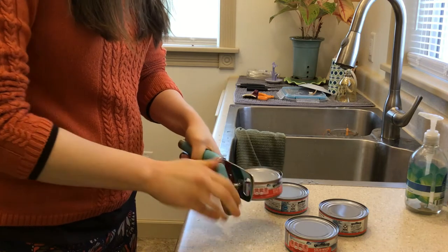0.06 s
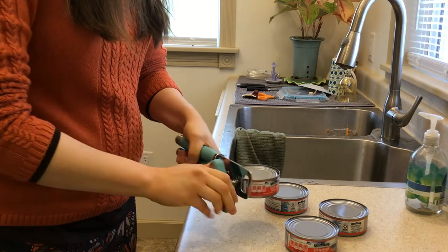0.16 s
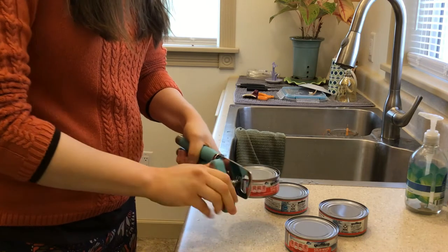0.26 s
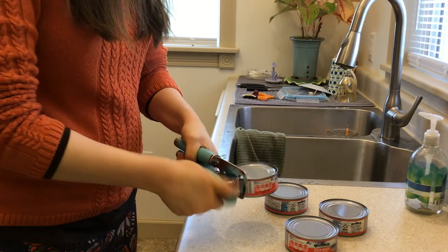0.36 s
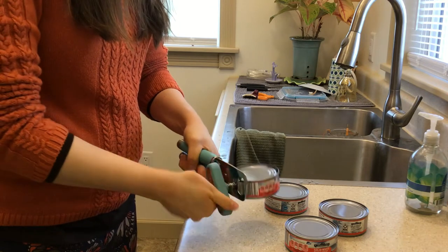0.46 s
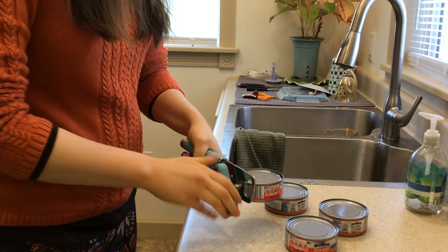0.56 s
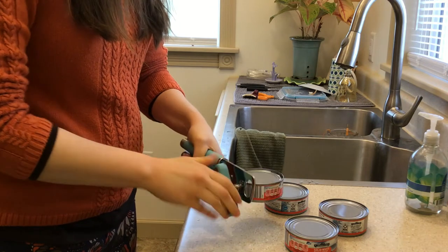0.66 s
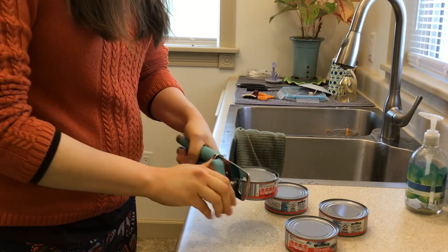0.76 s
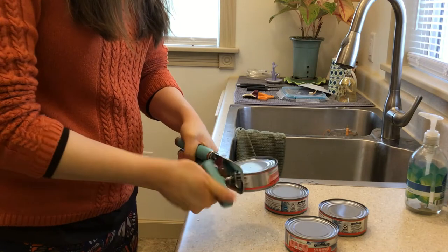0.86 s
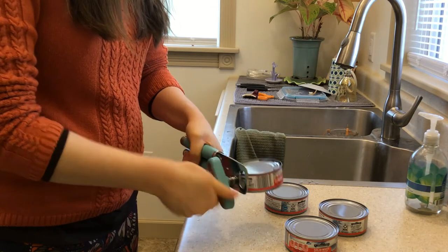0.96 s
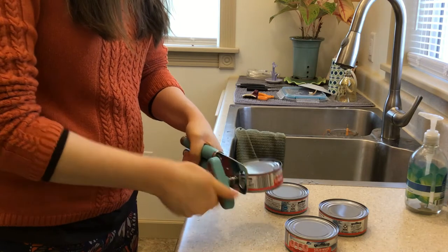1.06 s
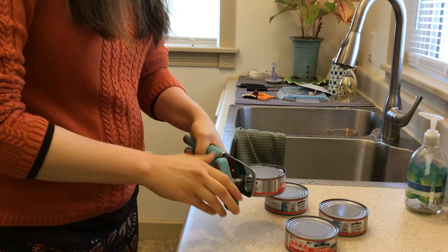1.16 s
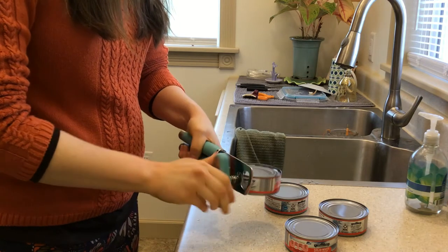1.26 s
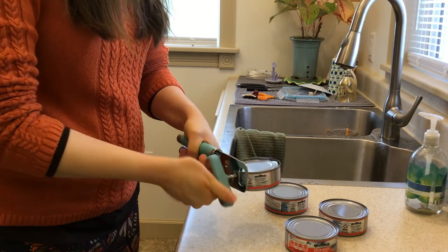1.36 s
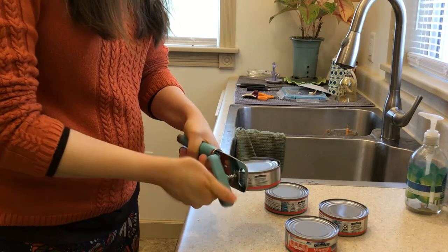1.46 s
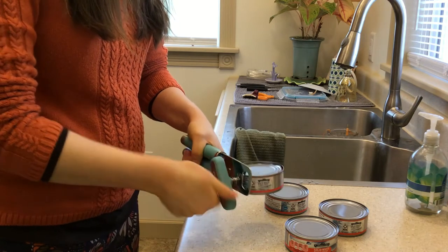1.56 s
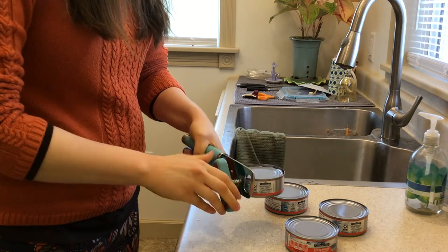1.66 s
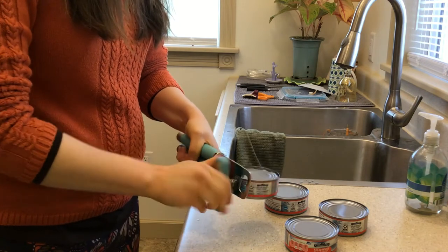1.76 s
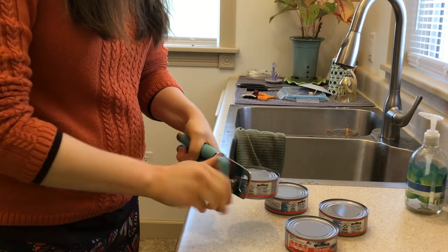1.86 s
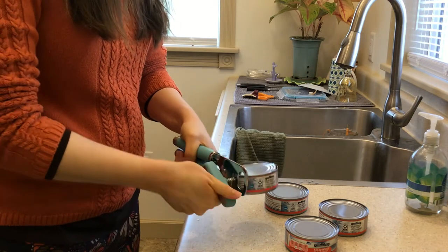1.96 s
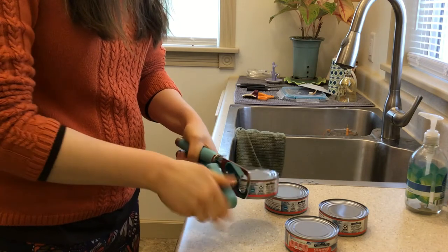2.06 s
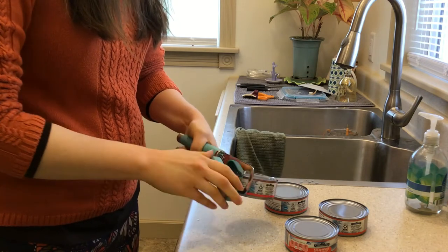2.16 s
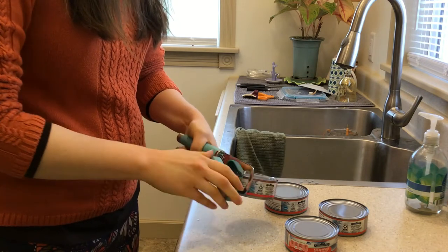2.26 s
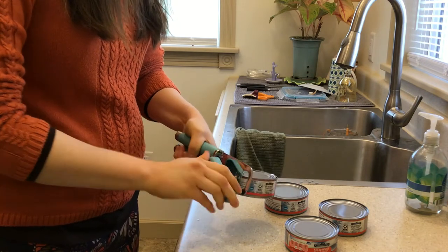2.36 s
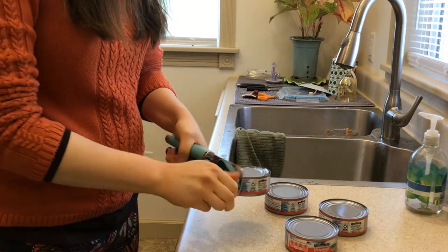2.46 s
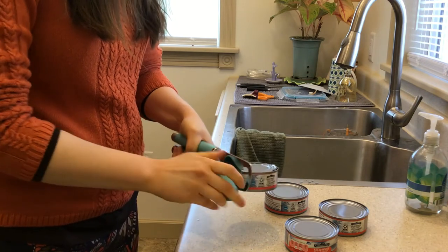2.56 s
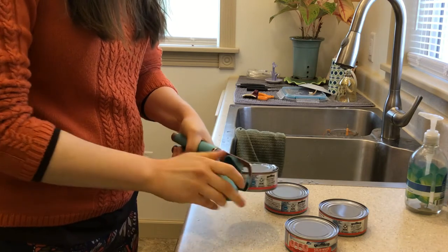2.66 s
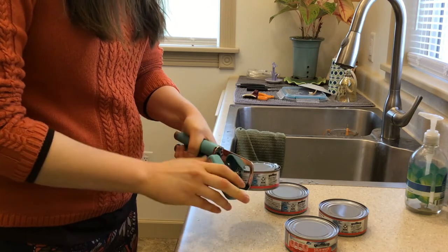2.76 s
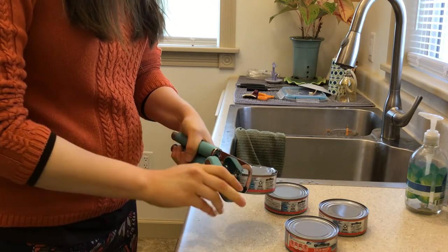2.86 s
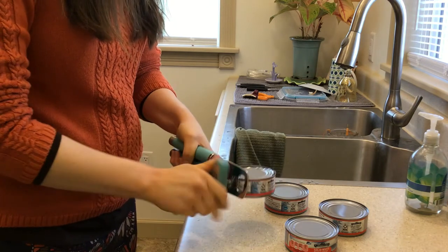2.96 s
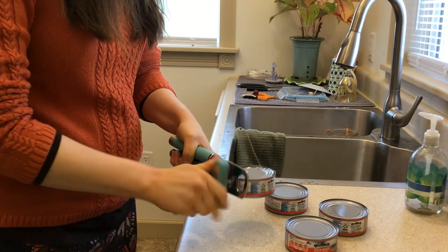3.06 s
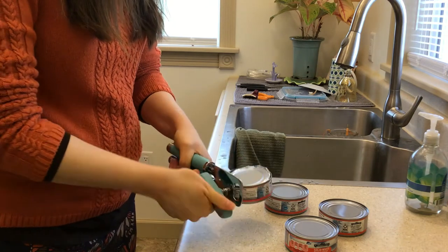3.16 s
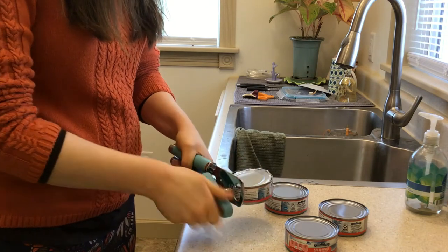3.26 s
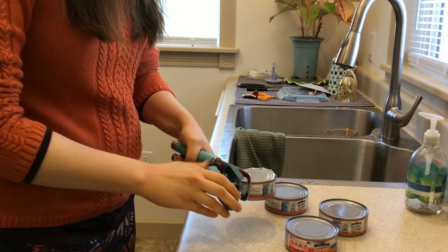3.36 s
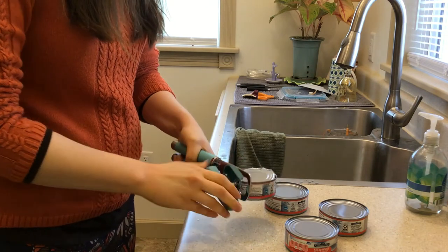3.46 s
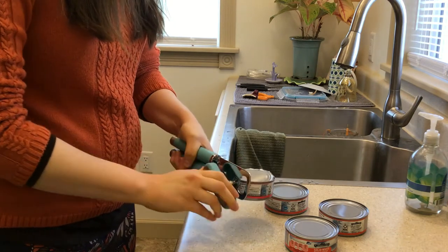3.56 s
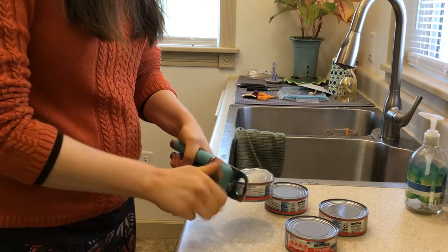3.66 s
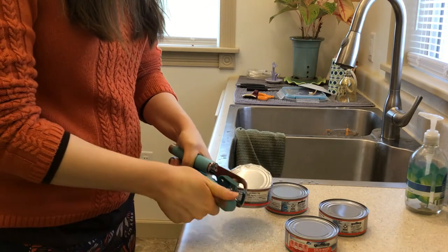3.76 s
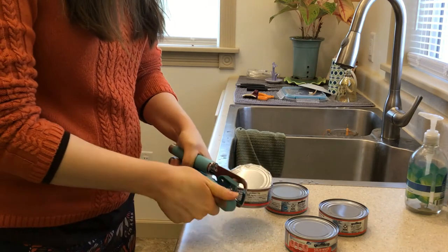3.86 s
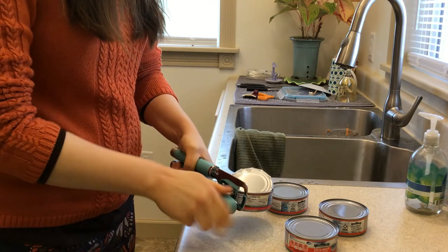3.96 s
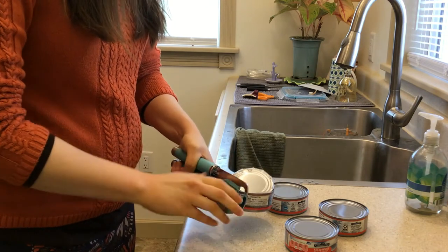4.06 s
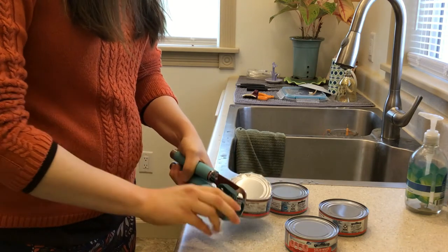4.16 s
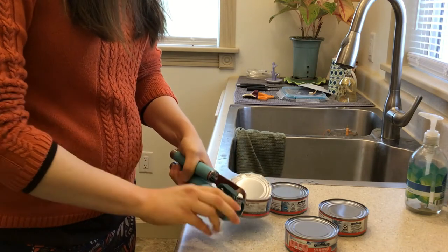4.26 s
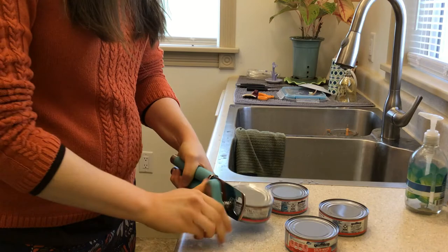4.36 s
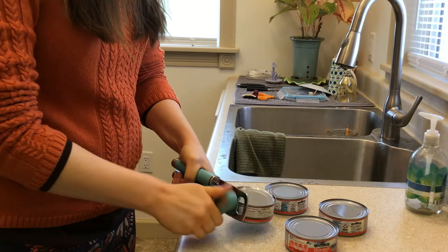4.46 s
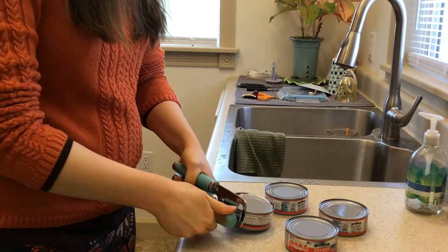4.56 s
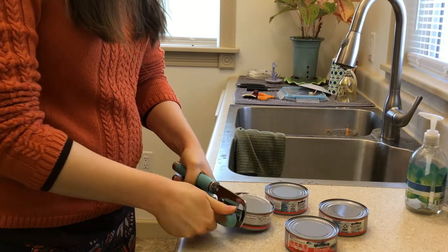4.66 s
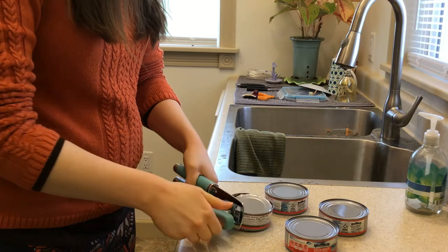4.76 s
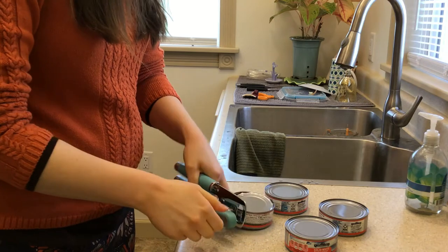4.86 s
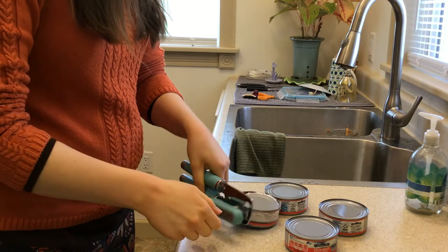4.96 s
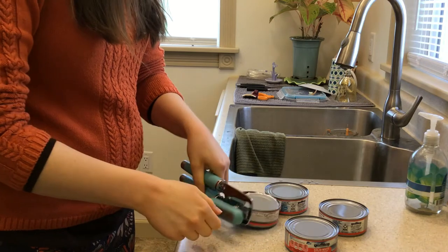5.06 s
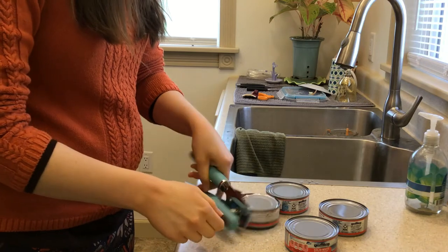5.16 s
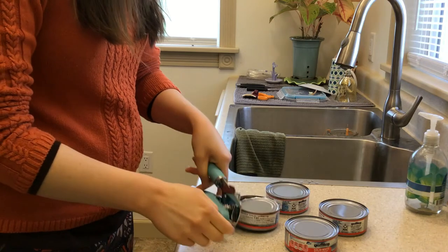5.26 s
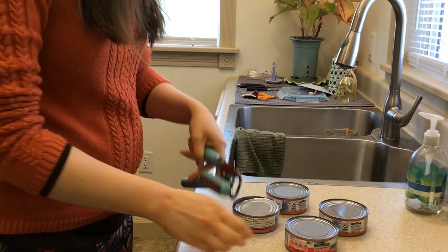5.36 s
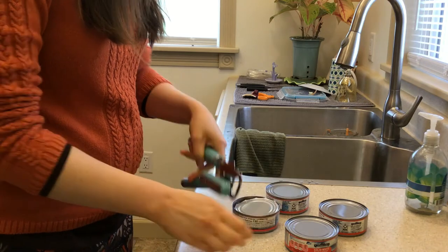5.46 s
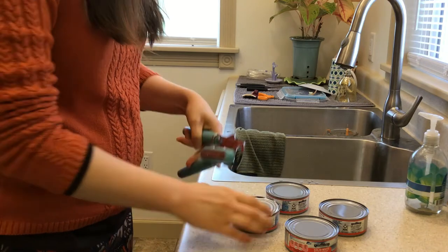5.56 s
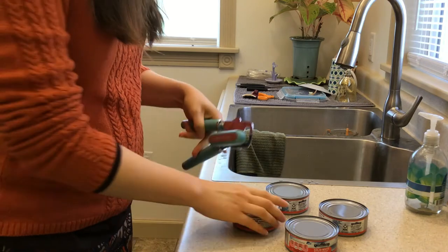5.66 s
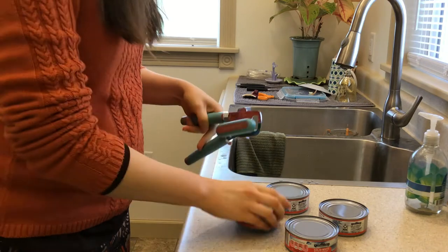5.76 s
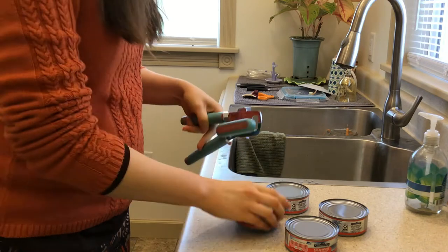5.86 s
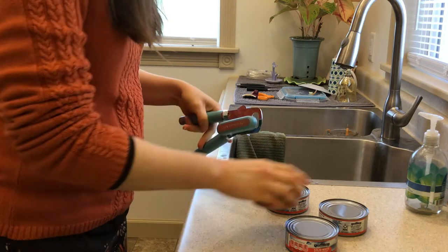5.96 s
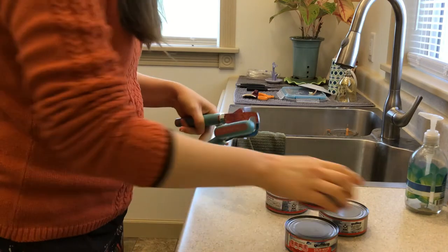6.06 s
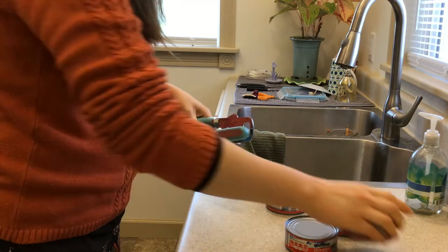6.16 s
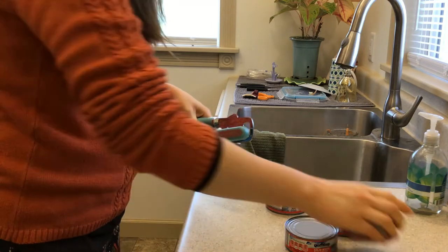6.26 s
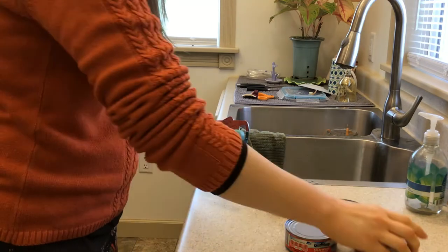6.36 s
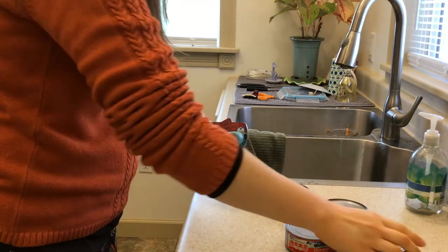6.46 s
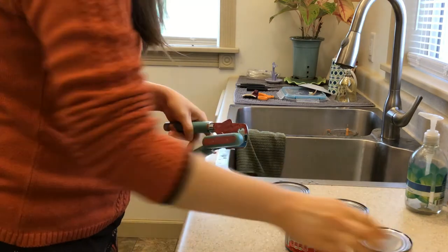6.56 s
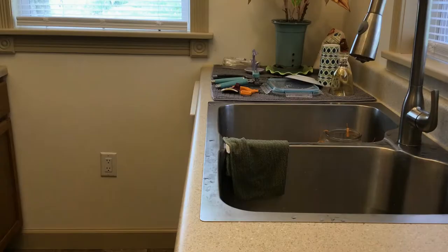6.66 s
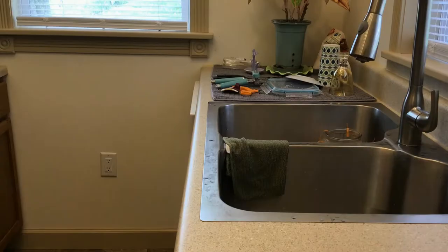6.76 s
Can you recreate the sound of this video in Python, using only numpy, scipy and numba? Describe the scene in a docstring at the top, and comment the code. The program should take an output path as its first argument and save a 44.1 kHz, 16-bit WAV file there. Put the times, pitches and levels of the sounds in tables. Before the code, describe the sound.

Close to a kitchen counter, a twist-key opener grinds round a can: rasping metal strokes, bright ticks and tiny cracks, gaps between grips. Two bright lid snaps ring out past the middle. Then come a hollow can knock, a cluster of clacks with low counter thuds and jaw rattle, soft movement, and a final double knock. Short room reverberation and quiet air surround it; the level briefly vanishes near the end.

```python
"""In a hard kitchen, a hand-cranked opener cuts round a small steel can, one crunching stroke for each twist.
Streams of tiny noise fractures drive lid and can resonances; short cracks and damped modes make the snaps.
The lid snaps twice as it comes free; the full can knocks on the counter, is let go, and is set down again.
Damped modes boom in the counter, a noise tail makes the room ring, and shaped noise and a sine make air and hum.
A short hollow buzz sounds once; near the end the level dips to nothing and only partly recovers."""
import sys
import numpy as np
from scipy import signal
from scipy.fft import rfft, irfft, next_fast_len
from scipy.io import wavfile
from scipy.ndimage import uniform_filter1d
from numba import njit

SR = 44100
rng = np.random.default_rng(int(sys.argv[2]) if len(sys.argv) > 2 else 0)


def to_wav(s):
    """Save 16-bit WAV."""
    ch = np.atleast_2d(s).T  # columns
    pcm = np.round(np.clip(ch, -1, 1) * 32767)  # PCM
    wavfile.write(sys.argv[1], SR, pcm.astype(np.int16))


N = 301188
T = np.arange(N) / SR  # time in seconds

# Levels in the tables are relative: each source and the room set the final balance.
# One row for each twist of the key, the last two for the rim scraping out of the jaws:
# start_s, length_s (up to the peak), level_db, treble_share_db, can_level_db, lid_pitch_hz (at the peak),
# lid_ring_share_db
TWISTS = [ (-0.1, 0.11, -44.5, -11.5, -57.5, 1196, -3), (0.356, 0.14, -45, -6, -57, 1350, 2),
          (0.875, 0.12, -41.5, -8, -59.5, 2420, -9), (1.395, 0.11, -40, -7, -56.5, 1775, -5.5),
          (1.923, 0.095, -41.5, -10, -60, 2010, 0.5), (2.537, 0.018, -47, -12, -64, 1970, -4),
          (3.051, 0.17, -42.5, -9.5, -68.5, 1740, -8.5), (3.692, 0.092, -51.5, -10, -71.5, 1847, -14),
          (4.399, 0.13, -50, -6.5, -66, 2540, -2.5), (5.171, 0.15, -57.5, -6, -57.5, 1030, 0.5),
          (5.36, 0.077, -43, -5, -54, 1018, -6.5), ]
# Spectrum of tearing steel: frequency_hz, level_db
TEARING_STEEL = [(100, -32.5), (350, -7), (800, -7.5), (1400, -1), (2200, 0), (2800, -0.5), (4100, -4.5),
                 (5000, -7.5), (6500, -8), (8500, -16), (11000, -34), (15500, -42)]
# Spectrum of cracking steel: frequency_hz, level_db
CRACKING_STEEL = [(100, -36), (700, -10.5), (1200, -14), (1700, 4), (2400, -0.5), (4300, -4), (5200, -10),
                  (6800, -16.5), (9000, -24.5), (12000, -42.5), (15500, -44)]
# The lid's modes beside its main resonance: frequency_hz, level_db, t60_s
LID_MODES = [(711, -17.5, 0.056), (1640, -9.5, .025), (2279, -5, 0.087), (2700, -4.5, .02),
             (2904, -7, 0.058), (3220, 0, 0.0489), (3475, -6, .025), (3928, 1, .025), (3970, -9, .03),
             (4316, -1.5, .025), (5050, -15, 0.027)]


def undb(db):
    """Decibels to gain."""
    return 10 ** (np.asarray(db) / 20)


def unit(x):
    """Scale to rms 1."""
    return x / np.sqrt(np.mean(x ** 2))


def blow(x):
    """Scale a struck sound to the energy of 5 ms at rms 1."""
    return x * np.sqrt(SR / 200 / np.sum(x ** 2))


def at_hz(points, hz):
    """Read a table on a log-frequency axis."""
    f, value = np.transpose(points)
    return np.interp(np.log(hz + 1), np.log(f), value)


def colour(x, points, tilt=0, pivot_hz=2000):
    """Causal minimum-phase filter with the given spectrum, tilted in dB per octave about a pivot."""
    n = 2 * next_fast_len(len(x))
    hz = np.arange(n // 2 + 1) * SR / n
    db = at_hz(points, hz) + tilt * np.log2(np.maximum(hz, 300) / pivot_hz)
    # folding the cepstrum forward in time makes the filter causal
    cepstrum = irfft(db * np.log(10) / 20)
    cepstrum[1:n // 2] *= 2
    cepstrum[n // 2 + 1:] = 0
    response = np.exp(rfft(cepstrum))
    return irfft(rfft(x, n) * response)[:len(x)]


def add(track, s, sound):
    """Mix a sound in at time s."""
    i = max(int(s * SR), 0)
    track[i:i + len(sound)] += sound[:max(N - i, 0)]


def high_pass(x, order, hz):
    """Butterworth filter that takes away the bass."""
    return signal.sosfilt(signal.butter(order, hz, "high", fs=SR, output="sos"), x)


@njit
def resonate(x, hz, width):
    """Resonance as a state-variable band-pass whose centre moves every sample; width in Hz."""
    y = np.empty(len(x))
    band, low = 0., 0.
    for i in range(len(x)):
        g = np.tan(np.pi * hz[i] / SR)
        damping = width / hz[i]
        v = (band + g * (x[i] - low)) / (1 + g * (g + damping))
        band = 2 * v - band
        low = low + 2 * g * v
        y[i] = damping * v
    return y


def ring(modes, scatter_db, detune):
    """Damped modes, dB as energy; every blow lands on a slightly different spot."""
    hz, db, t60 = np.transpose(modes)[:, :, None]
    t = T[:SR // 2]
    size, shift = rng.standard_normal((2, len(modes), 1))
    sign = rng.choice([-1, 1], hz.shape)
    gain = sign * undb(db + scatter_db * size) / np.sqrt(t60)
    decay = np.exp(-np.log(1000) * t / t60)
    tones = np.sin(2 * np.pi * hz * (1 + detune * shift) * t)
    return blow(np.sum(gain * decay * tones, axis=0))


def contact(points, tilt, chatter_s, chatter):
    """A sharp push with a few milliseconds of chatter behind it, flattened in spectrum, then coloured."""
    t = T[:SR // 10]
    push = chatter * rng.standard_normal(len(t)) * np.exp(-t / chatter_s)
    push[0] += 1
    # keep the phase only, so every frequency is equally strong
    even = irfft(np.exp(1j * np.angle(rfft(push))))[:SR // 20]
    # the contact takes a fraction of a millisecond to build
    build = 1 - np.exp(-t[:len(even)] / 0.00052)
    return blow(colour(even * build, points, tilt))


def twists(bite_s=0.02, build_db_per_s=98, release_db_per_s=498.5):
    """The wheel bites, pressure builds steadily, then the hand lets go; the can drones evenly under the grip."""
    force, bright, deep = np.zeros((3, N))
    for start, length, db, treble_db, can_db, _, _ in TWISTS:
        past_peak = T - start - length
        bite = np.clip((T - start) / bite_s, 0, 1)
        grip = bite * undb(-release_db_per_s * np.clip(past_peak, 0, 1))
        push = grip * undb(db + build_db_per_s * np.minimum(past_peak, 0))
        force += push
        bright += push * undb(treble_db)
        deep += grip * undb(can_db)
    return force, bright, deep


def lid_state(rise_octaves_per_s=1.54, flex_s=0.12):
    """Pitch and ring share of the lid's main resonance; near each peak the pitch climbs as the lid is strained."""
    start, length, _, _, _, hz, db = np.transpose(TWISTS)
    peaks = start + length
    nearest = np.searchsorted((peaks[1:] + peaks[:-1]) / 2, T)
    strain_s = np.clip(T - peaks[nearest], -flex_s, flex_s)
    pitch = hz[nearest] * 2 ** (rise_octaves_per_s * strain_s)
    return pitch, undb(db[nearest])


def cutting(fractures_per_s=1400, spread_db=3.5, grit=.08, surge_db=4.5,
            lid_width_hz=130., can_hz=430., can_width_hz=350.):
    """The wheel tears the lid in a stream of tiny fractures, which ring the lid and the can as they go."""
    force, bright, deep = twists()
    lid_hz, lid_share = lid_state()
    sizes = undb(spread_db * np.minimum(rng.exponential(size=N), 2)) * rng.choice([-1, 1], N)
    fractures = unit(sizes * (rng.random(N) < fractures_per_s / SR))
    fractures = fractures + grit * rng.standard_normal(N)
    # the blade sticks and slips, so the fractures come in clusters
    slip = np.tanh(unit(uniform_filter1d(rng.standard_normal(N), size=300)))
    fractures = unit(fractures * undb(surge_db * slip))
    # bending waves spread each fracture over a few milliseconds
    spread = contact(TEARING_STEEL, tilt=0, chatter_s=0.0025, chatter=.6)
    tear = unit(signal.fftconvolve(fractures, spread)[:N])
    crunch = signal.sosfilt(signal.butter(2, 4500, fs=SR, output="sos"), tear)
    fizz = high_pass(tear, 3, 4600)
    lid = unit(resonate(fractures, lid_hz, lid_width_hz)) * lid_share
    steel = unit(signal.fftconvolve(fractures, ring(LID_MODES, 1, 0.0034))[:N])
    can = unit(resonate(fractures, np.full(N, can_hz), can_width_hz))
    cut = undb(-7.5) * crunch + undb(-7.0) * lid + undb(-22) * steel
    return force * cut + bright * undb(5) * fizz + deep * undb(-3.0) * can


def gritty_ticks(ticks_per_s=70, spread_db=3, level_db=-13, tilt=4):
    """Bigger fractures stand out of the cut as bright ticks, spread at random and following its force."""
    ticks = undb(spread_db * rng.standard_normal(N)) * (rng.random(N) < ticks_per_s / SR)
    tick = contact(CRACKING_STEEL, tilt, chatter_s=0.0015, chatter=1.0)
    force = twists()[0]
    return undb(level_db) * force * unit(signal.oaconvolve(ticks, tick)[:N])


def snaps(main_db=1, main_t60=0.041, swell_s=0.00044):
    """Steel gives way with a short tearing crack and the lid rings at its present pitch."""
    # The blade breaks through the rim: time_s, crack_db, tilt_db_per_octave, lid_ring_db
    breaks = [(0.4102, -47.5, -12.5, -63), (0.4533, -45.5, 2.5, -50), (0.9007, -55.5, -8.5, -64),
              (0.9848, -41, -4.5, -59), (1.5611, -45, 3.5, -55), (1.879, -42.5, -1, -64),
              (1.9607, -42.5, 12, -63), (1.9675, -40.5, -1.5, -40.5), (2.4379, -60.5, 1, -59),
              (2.554, -58, -8, -56), (3.083, -55, 9.5, -77), (3.207, -60, 16, -46),
              (3.788, -31, 4.5, -28.5), (3.8953, -33.5, -3.5, -30), (3.902, -38, 2.5, -32),
              (3.923, -56, -5.5, -61), (4.4363, -54.5, 7, -73)]
    out = np.zeros(N)
    pitch = lid_state()[0]
    swell = 1 - np.exp(-T[:SR // 2] / swell_s)
    for s, crack_db, tilt, ring_db in breaks:
        modes = [(pitch[int(s * SR)], main_db, main_t60)] + list(LID_MODES)
        crack = contact(CRACKING_STEEL, tilt, chatter_s=0.0038, chatter=0.37)
        add(out, s, undb(crack_db) * crack)
        lid = ring(modes, scatter_db=2, detune=.016)
        add(out, s, undb(ring_db) * blow(swell * lid))
    return out


def knocks():
    """The rim clacks, the full can rings briefly, and the counter booms after it."""
    # The can meets the counter: time_s, clack_db, tilt_db_per_octave, end_ring_db, body_ring_db, boom_db
    impacts = [(4.499, -47.5, 0.5, -58, -53, -32), (4.8555, -26, -1.5, -36, -54.5, -33),
               (5.17, -49, -4, -52, -60, -41.5), (5.3127, -25.5, -1, -19.5, -39, -36),
               (5.3206, -34, -1, -40, -20.5, -25), (5.328, -29.5, 3.5, -42.5, -50, -46.5),
               (5.372, -30, 2.5, -49, -47, -57), (5.461, -29.5, 0.5, -34.5, -51, -23.5),
               (5.483, -32.5, -6, -60.5, -62.5, -47), (5.845, -63, -3, -69, -67.5, -52),
               (6.51, -26, 1, -37, -37, -39.5), (6.534, -21, 1.5, -26.5, -27, -25.5),
               (6.5486, -44, -1, -44, -46, -36.5)]
    # Spectrum of rim on stone: frequency_hz, level_db
    rim_on_stone = [(60, -16), (160, 0.5), (500, -1), (680, 1.5), (850, -0.5), (1050, 6.5), (1300, 0),
                    (2100, -1.5), (3200, -9.5), (4200, -12), (6000, -15.5), (9300, -26.5), (12000, -32.5),
                    (15500, -41.5)]
    # The can's drum-like end: frequency_hz, level_db, t60_s
    end_modes = [(1155, -9.5, 0.09), (1190, -7, 0.066), (1428, -15, .1), (1574, -4.5, 0.031),
                 (1695, -3.5, 0.0122), (1840, -15, 0.038), (2038, -8, 0.068), (3097, -18, 0.023)]
    # The full can rocking on its base: frequency_hz, level_db, t60_s
    body_modes = [(232.8, -9, 0.12), (298, -3.5, 0.074), (389.6, -4.5, 0.18), (428, -3.5, 0.032),
                  (512, -14, 0.14), (615, -7, 0.025)]
    # Counter top and cabinet: frequency_hz, level_db, t60_s
    counter_modes = [(69.6, -5, 0.43), (83.7, -5, 0.14), (121, -7.5, 0.18), (171.4, -11.5, .35),
                     (228.8, -11, 0.32)]
    can, boom = np.zeros((2, N))
    # the heavy slab takes a moment to get moving
    swell = 1 - np.exp(-T[:SR // 2] / 0.0027)
    for s, clack_db, tilt, end_db, body_db, boom_db in impacts:
        add(can, s, undb(clack_db) * contact(rim_on_stone, tilt, chatter_s=0.0021, chatter=0.32))
        add(can, s, undb(end_db) * ring(end_modes, scatter_db=1.5, detune=.006))
        add(can, s, undb(body_db) * ring(body_modes, scatter_db=1, detune=0.0056))
        slab = ring(counter_modes, scatter_db=8.5, detune=0.013)
        add(boom, s, undb(boom_db) * blow(swell * slab))
    return can, boom


def hollow_buzz(centre_s=1.432, length_s=0.045, pitch_hz=199.7, level_db=-47.5, jitter=0.0045, tilt=-5,
                low_cut_hz=480):
    """A short hollow buzz of odd harmonics on a wavering 200 Hz pitch, with its bass cut."""
    n = int(length_s * SR)
    waver = unit(uniform_filter1d(rng.standard_normal(SR // 2), size=300))[:n]
    phase = 2 * np.pi * np.cumsum(pitch_hz * (1 + jitter * waver)) / SR
    # a rounded square wave holds odd harmonics only; its slope is a pulse at each flip
    square = np.tanh(10 * np.sin(phase))
    buzz = high_pass(colour(np.gradient(square), TEARING_STEEL, tilt), 4, low_cut_hz)
    out = np.zeros(N)
    add(out, centre_s - length_s / 2, undb(level_db) * np.hanning(n) * unit(buzz))
    return out


def clinks(tick_db=-5):
    """Loose steel parts of the opener tap each other, each tap a tick and a ring of the plates."""
    # The opener's jaws and gears rattle: time_s, level_db
    taps = [(1.35, -58.5), (5.167, -52), (5.229, -61.5), (5.3172, -46), (5.373, -39.5), (5.416, -46),
            (5.4633, -40.5)]
    # The opener's steel plates: frequency_hz, level_db, t60_s
    plate_modes = [(2800, 1, .02), (3640, -11, .012), (4140, -8.5, .018), (5270, 0.5, 0.022),
                   (6310, 2, 0.027), (7300, -22, 0.01), (8580, -4.5, 0.022), (9450, -8, 0.025),
                   (11600, -24, .012)]
    out = np.zeros(N)
    for s, db in taps:
        tick = contact(CRACKING_STEEL, tilt=3.7, chatter_s=0.0029, chatter=.5)
        add(out, s, undb(db + tick_db) * tick)
        add(out, s, undb(db) * ring(plate_modes, scatter_db=6.5, detune=0.0066))
    return out


def key_squeaks(width_hz=300., rub_db=-2):
    """The key's shaft rubs thinly in its bearing while the hand takes a new grip."""
    # The key turning back between twists: centre_s, length_s, level_db, squeak_hz
    turns = [(0.209, 0.036, -70, 6400), (0.688, 0.082, -66, 8400), (0.743, 0.019, -59.5, 6400),
             (1.141, 0.057, -65.5, 6500), (1.351, 0.039, -66, 9050), (1.765, 0.051, -63.5, 6300),
             (2.147, 0.018, -58.5, 6260), (2.261, 0.066, -67, 6550), (2.498, 0.045, -58, 6260),
             (2.791, 0.1, -73.5, 3000), (3.363, 0.029, -66, 6300), (4.174, 0.079, -72.5, 6500),
             (4.742, 0.041, -65, 6500)]
    out = np.zeros(N)
    for s, length, db, hz in turns:
        n = int(length * SR)
        friction = rng.standard_normal(SR // 2)[:n]
        squeak = unit(resonate(friction, np.full(n, float(hz)), width_hz))
        rub = unit(colour(friction, TEARING_STEEL, tilt=4.9))
        add(out, s - length / 2, undb(db - 5.5) * np.hanning(n) * (squeak + undb(rub_db) * rub))
    return out


def kitchen(x, wet_db=-3, early_db=-6, early_s=0.015, gap_s=0.0051):
    """Direct sound, near echoes from counter and walls, then a diffuse tail that loses its high treble first."""
    # Kitchen reverberation: frequency_hz, t60_s
    reverb = [(80, 0.61), (300, 0.45), (1100, 0.51), (2500, 0.49), (5000, 0.41), (9000, 0.4), (15000, 0.34)]
    t = T[:SR]
    hz = np.arange(SR // 2 + 1)
    noise = rfft(rng.standard_normal(SR))
    centres = np.array(reverb)[:, 0]
    tail = np.zeros(SR)
    # overlapping bands of one noise, each with its own decay
    for (_, t60), share in zip(reverb, np.eye(len(reverb))):
        band = at_hz(np.c_[centres, share], hz)
        tail += irfft(noise * band) * np.exp(-np.log(1000) * t / t60)
    # nothing returns before the gap
    late = np.clip(t / gap_s - 1, 0, 1)
    echoes = rng.standard_normal(SR) * (rng.random(SR) < 900 / SR)
    early = echoes * np.exp(-t / early_s) * late
    response = undb(wet_db) * tail * late / np.linalg.norm(tail)
    response += undb(early_db) * early / np.linalg.norm(early)
    return x + signal.fftconvolve(x, response)[:N]


def shuffle(still_db=-81):
    """Soft rumble and rustle of someone moving at the counter, as coloured noise in swells."""
    # Movements at the counter: peak_s, level_db, rise_db_per_s, fall_db_per_s
    swells = [(5.3, -49.5, 39, 36), (5.856, -52.5, 450, 228), (6.8, -43, 72, 200)]
    # Spectrum of rumble and rustle: frequency_hz, level_db
    rumble = [(30, -28.5), (80, 1.5), (160, -4.5), (300, -10), (500, -18), (1500, -30.5), (6000, -37.5),
              (15000, -56.5)]
    level = undb(still_db)
    for s, db, rise, fall in swells:
        below_peak_db = np.maximum(rise * (s - T), fall * (T - s))
        level = np.maximum(level, undb(db - below_peak_db))
    return unit(colour(rng.standard_normal(N), rumble)) * level


def background(air_db=-66, hum_hz=118, hum_db=-75):
    """Steady room air as coloured noise and a faint appliance hum as a sine."""
    # Spectrum of the room air: frequency_hz, density_db (per Hz, relative)
    room_air = [(15, -53), (25, -34), (43, -6.5), (123, -1.5), (256, -6), (326, -8.5), (373, -14),
                (575, -7.5), (887, -18), (1230, -20), (1560, -29), (1890, -25.5), (2550, -28.5),
                (4740, -28.5), (16000, -43.5)]
    air = unit(colour(rng.standard_normal(N), room_air)) * undb(air_db)
    return air + undb(hum_db) * np.sin(2 * np.pi * hum_hz * T)


def dip(dip_s=6.692, close_s=0.037, recover_s=0.27):
    """Gain of the dip near the end: the level closes quickly to nothing, then recovers slowly."""
    closing = np.clip((dip_s - T) / close_s, 0, 1) ** 2
    recovery = np.clip((T - dip_s) / recover_s, 0, 1)
    return closing + recovery


def scene(near_db=-13):
    """Opener and can in the kitchen, with the counter close to the microphone."""
    can, boom = knocks()
    opener = cutting() + gritty_ticks() + key_squeaks() + snaps() + clinks()
    room = kitchen(opener + hollow_buzz() + can)
    # the counter top throws the knocks straight at the microphone
    near = undb(near_db) * can + boom
    return ((room + near + background() + shuffle()) * dip())[None]


def record(dry, low_cut_hz=48, top_hz=15850):
    """The microphone drops the deepest bass and the recorder cuts the top."""
    thin = high_pass(dry, 4, low_cut_hz)
    return signal.sosfilt(signal.ellip(10, .2, 70, top_hz, fs=SR, output="sos"), thin)


dry = scene()
out = record(dry)
to_wav(out)
```